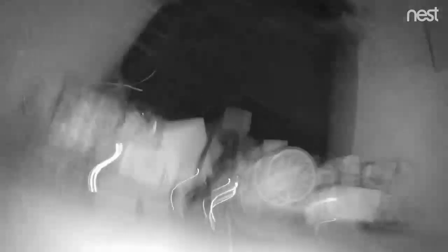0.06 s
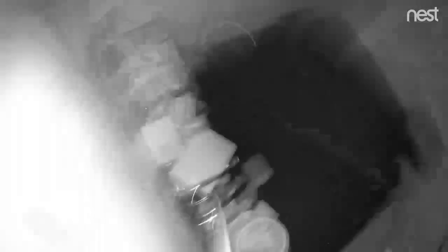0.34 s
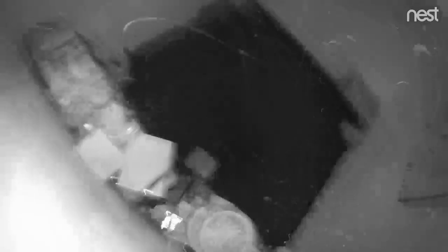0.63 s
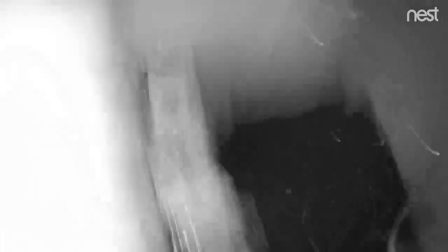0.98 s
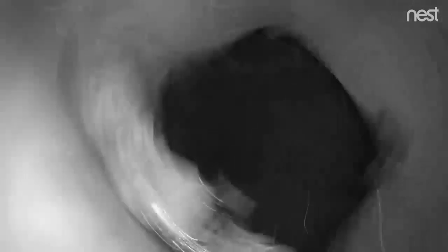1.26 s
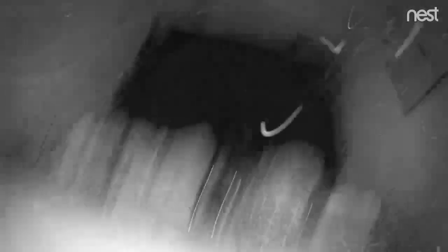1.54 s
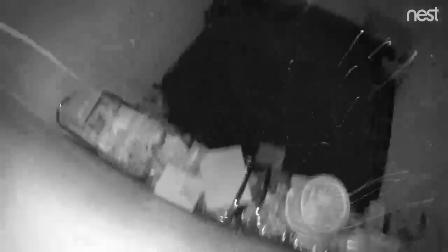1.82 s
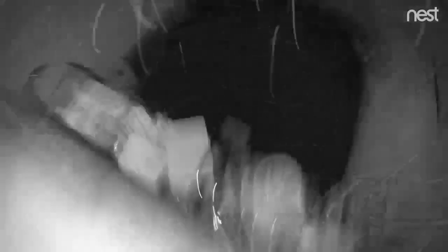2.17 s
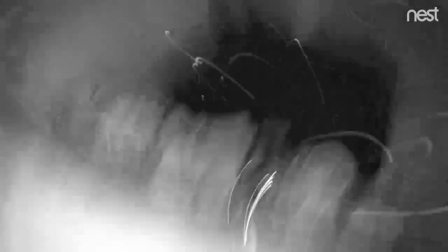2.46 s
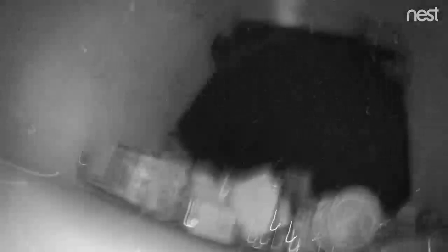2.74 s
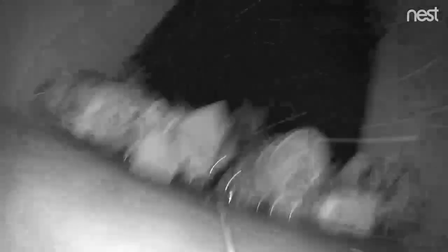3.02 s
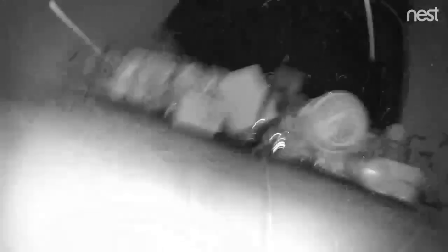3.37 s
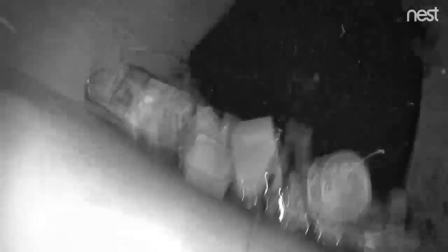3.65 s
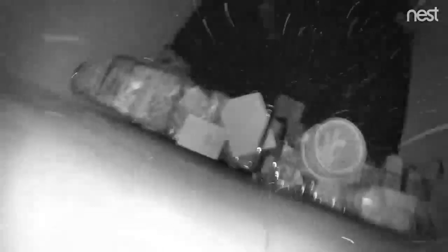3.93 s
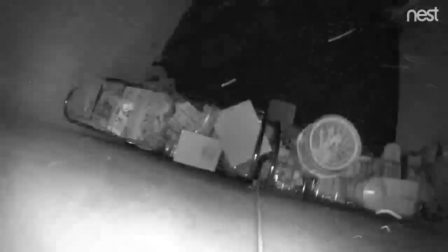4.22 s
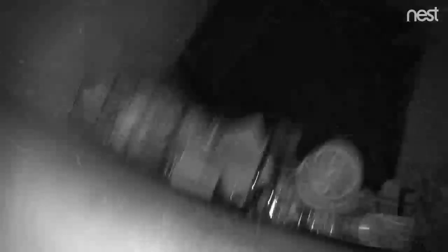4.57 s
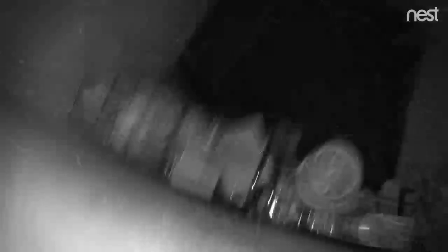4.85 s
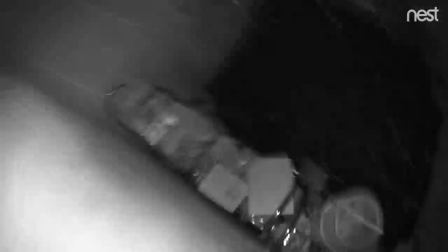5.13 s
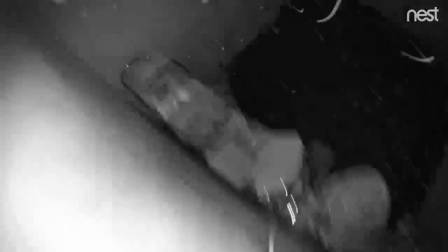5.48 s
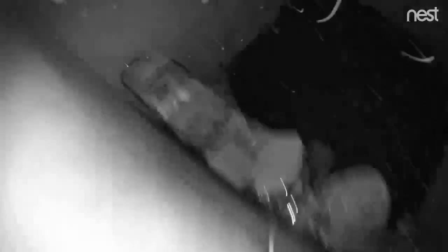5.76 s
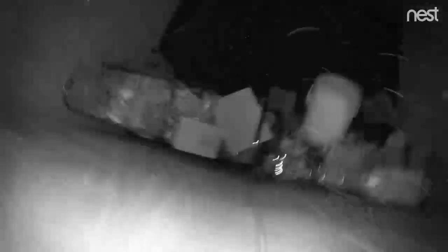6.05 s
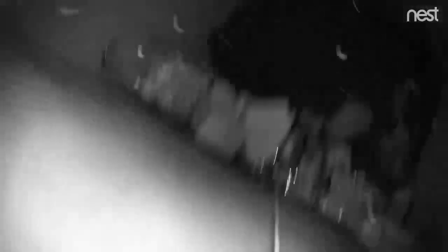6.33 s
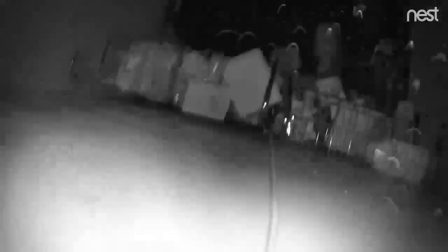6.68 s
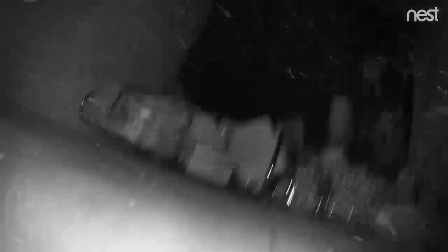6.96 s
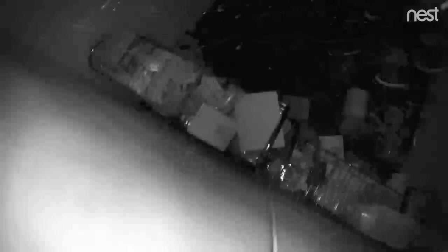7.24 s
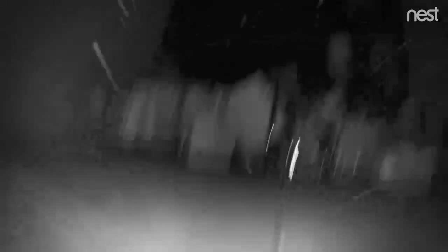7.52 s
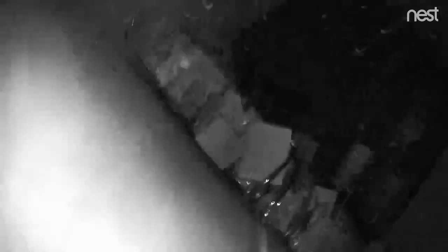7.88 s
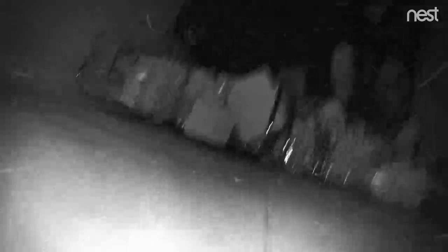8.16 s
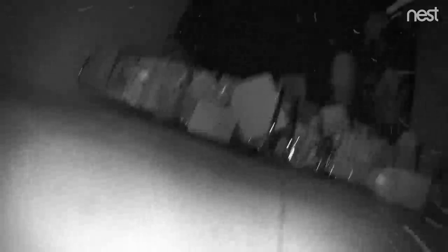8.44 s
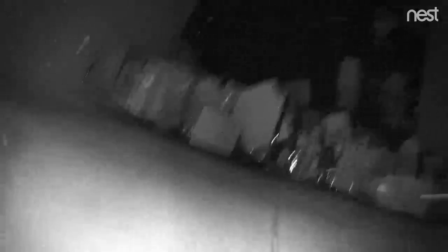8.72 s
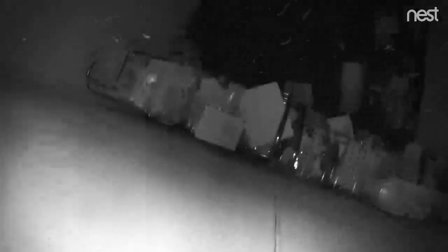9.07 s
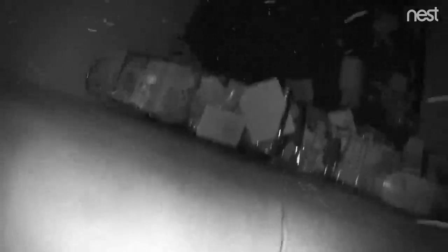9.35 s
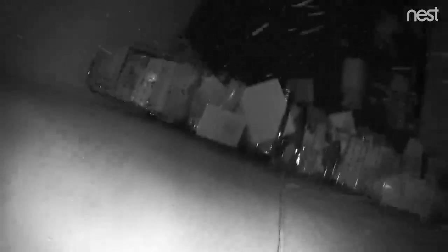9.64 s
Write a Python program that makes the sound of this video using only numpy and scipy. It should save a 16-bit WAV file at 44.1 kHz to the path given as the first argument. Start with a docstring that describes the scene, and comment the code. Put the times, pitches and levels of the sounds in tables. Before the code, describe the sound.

Walls and furniture rumble in an earthquake as shelves of small things clatter and heavier objects fall, the shaking slowly easing.

```python
"""An earthquake shakes a room, heard through a small microphone on a shelf of trinkets.
From the start the building rumbles, furniture thumps and loose things rattle. At once heavy things
bang and tumble further off, small hard ones clack close by, and jolted shelves clatter in bursts.
Near 2 s a glass clinks and a metal object is shaken into ringing until it falls over. More bangs and
glasses come from 6 s on; the shaking slowly eases, with a last surge of falls near 8.5 s."""
import sys
import numpy as np
from scipy import signal
from scipy.fft import rfft, irfft
from scipy.io import wavfile

SR = 44100
rng = np.random.default_rng(int(sys.argv[2]) if len(sys.argv) > 2 else 0)


def waveform_to_disk(signal):
    """Save audio, clipped to [-1, 1], as 16-bit WAV at the path in sys.argv[1]."""
    frames = np.transpose(np.atleast_2d(signal))
    scaled = np.clip(frames, -1, 1) * 32767
    samples = np.round(scaled).astype(np.int16)
    wavfile.write(sys.argv[1], SR, samples)


N = 436590
TIME = np.arange(N) / SR


def gain_of(db):
    """Decibels to amplitude."""
    return 10 ** (np.asarray(db) / 20)


def unit_rms(x):
    """Scales to an rms of one."""
    return x / np.sqrt(np.mean(x ** 2) + 1e-20)


def decay(t, t60_s):
    """Exponential fall, 60 dB in t60_s."""
    return np.exp(-np.log(1000) * t / t60_s)


def at_hz(points, hz):
    """Interpolates a table over log frequency."""
    f, value = np.transpose(points)
    return np.interp(np.log(hz + 1), np.log(f + 1), value)


def follow(rows, column=1):
    """One column of a time curve, at every sample."""
    rows = np.asarray(rows)
    return np.interp(TIME, rows[:, 0], rows[:, column])


def add(mix, start_s, sound):
    """Mixes a sound in at start_s."""
    part = mix[max(round(start_s * SR), 0):][:len(sound)]
    part += sound[:len(part)]


def coloured(x, spectrum):
    """Filters x by a spectrum; unit rms."""
    hz = np.fft.rfftfreq(len(x), 1 / SR)
    return unit_rms(irfft(rfft(x) * gain_of(at_hz(spectrum, hz)), len(x)))


def burst(noise, envelope):
    """Shaped noise with the energy of its envelope."""
    return unit_rms(noise * envelope) * np.sqrt(np.mean(envelope ** 2))


def wander(hz):
    """Random drift of bandwidth hz, rms about one."""
    points = 4096
    f = np.fft.rfftfreq(points, N / SR / points)
    drift = unit_rms(irfft(rfft(rng.standard_normal(points)) * np.exp(-(f / hz) ** 2)))
    return np.interp(TIME, np.linspace(0, N / SR, points), drift)


def impacts(per_s, spread_db, size=N):
    """Random train of blows; a positive spread makes a few stand out."""
    strength = gain_of(spread_db * np.minimum(rng.exponential(1, size), np.pi))
    return strength * rng.choice([-1., 1.], size) * (rng.random(size) < per_s / SR)


def jolt(start_s, db, rise_s, steepness=0.7):
    """Envelope of one jolt: peaks after rise_s, dies away more slowly."""
    age = np.maximum(TIME - start_s, 1e-9) / rise_s
    return gain_of(db) * np.exp(np.maximum(steepness * (np.log(age) + 1 - age), -20))


# Room decay: (frequency [Hz], t60 [s])
ROOM_DECAY = [(150, 0.37), (500, 0.37), (1500, 0.31), (3000, 0.31), (7000, 0.14)]


def room(x):
    """Dense reflections, treble dying first; the tail outlasts x."""
    taps = rng.standard_normal(SR // 2) * (rng.random(SR // 2) < .1)
    hz, t, bands = signal.stft(taps, SR, nperseg=256)
    tail = signal.istft(bands * decay(t, at_hz(ROOM_DECAY, hz)[:, None]), SR, nperseg=256)[1]
    return signal.oaconvolve(x, tail / np.linalg.norm(tail))


def scattered_room(x, hop_s=.25):
    """Sources lie all over the room, so each moment has its own reflections."""
    out = np.zeros(N)
    for centre_s in np.arange(0, N / SR + hop_s, hop_s):
        span = slice(max(round((centre_s - hop_s) * SR), 0), round((centre_s + hop_s) * SR))
        window = np.cos(np.pi / 2 * (TIME[span] - centre_s) / hop_s)
        add(out, span.start / SR, room(x[span] * window))
    return out


# Quake strength: (time [s], rumble level [dB], rattle level [dB])
QUAKE = [(0, -30, -33), (.33, -36, -39), (.6, -35.5, -37), (1.3, -38.5, -37.5), (1.7, -41.5, -40),
         (2.05, -38, -41), (2.4, -39.5, -33), (2.85, -39.5, -41), (3.65, -39.5, -40.5), (3.8, -41.5, -44),
         (4.35, -45, -49), (4.62, -43.5, -42), (4.9, -40.5, -42), (5.25, -46.5, -47), (5.65, -40, -41.5),
         (6.25, -40, -40), (6.85, -43, -39.5), (7.25, -46, -47), (7.55, -42, -45), (7.9, -48, -50.5),
         (8.15, -50.5, -48), (8.4, -54, -54.5), (8.72, -40, -45), (9.08, -58, -56), (9.4, -56.5, -57),
         (9.9, -49, -50.5)]


def shaking_db(column, jolts, steady_db=0):
    """Steady shaking and jolts, summed in power."""
    steady = gain_of(follow(QUAKE, column) + steady_db)
    return 10 * np.log10(steady ** 2 + sum(strength ** 2 for strength in jolts))


# Furniture landings: (time [s], level [dB])
LANDINGS = [(0.0, -33), (0.281, -32), (0.68, -31), (0.85, -45), (2.17, -27.5), (2.509, -32), (2.98, -33),
            (3.21, -35), (3.36, -45), (4.0, -42), (4.44, -40), (5.36, -36.5), (5.745, -36.5), (5.82, -35.5),
            (6.049, -28), (6.59, -31), (6.9, -39.5), (7.058, -37), (7.42, -35.5), (7.765, -40),
            (8.11, -47.5), (8.585, -39), (9.83, -62)]


def thumps(rise_s=0.024):
    """Rocking furniture comes down on the floor: one envelope per landing."""
    return (jolt(start_s, db, rise_s) for start_s, db in LANDINGS)


# Spectrum of walls and furniture: (frequency [Hz], density [dB])
STRUCTURE_SPECTRUM = [(20, -26), (50, -19), (110, -16), (150, -9.5), (210, -6.5), (310, -1.5), (420, 2),
                      (540, 0.5), (720, 0.5), (1000, -9), (1600, -9.5), (3000, -38), (8000, -78)]
# Heavy floor relative to light furniture: (time [s], bass gain [dB])
FLOOR_WEIGHT = [(0, 0.5), (2.4, 8), (3.9, -1.5), (4.6, 7.5), (5.4, 0.5), (6.2, 3), (9.9, 2)]


def rumble(steady_db=1, throb_db=1, floor_swing_db=2, floor_hz=280):
    """Walls, floor and furniture knock together many times a second."""
    knocks = impacts(per_s=420, spread_db=2.5)
    body = coloured(knocks + scattered_room(knocks), STRUCTURE_SPECTRUM)
    floor = signal.sosfiltfilt(signal.butter(2, floor_hz, fs=SR, output="sos"), body)
    floor_gain = gain_of(follow(FLOOR_WEIGHT) + floor_swing_db * wander(hz=27))
    force_db = shaking_db(column=1, jolts=thumps(), steady_db=steady_db)
    return (body - floor + floor * floor_gain) * gain_of(force_db + throb_db * wander(hz=41))


# Spectrum of the heaving ground: (frequency [Hz], density [dB])
GROUND_SPECTRUM = [(15, -18.5), (30, -11), (50, 1), (70, -0.5), (110, -9.5), (200, -24), (600, -63.5)]


def ground(level_db=-24.5, heave_db=1.5):
    """The ground heaves under the house, swelling with the shaking and each thump."""
    force_db = shaking_db(column=1, jolts=thumps())
    deep = coloured(rng.standard_normal(N), GROUND_SPECTRUM)
    return deep * gain_of(force_db + level_db + heave_db * wander(hz=8))


def chatter(t60_s=0.029, blows_per_s=130, modes=16):
    """One loose thing bounces briefly, ringing on its own modes."""
    t, window = np.arange(SR // 40) / SR, np.hanning(SR // 8)
    hz = rng.uniform(400, 7500, (modes, 1))
    mode_t60_s = t60_s * 2 ** rng.uniform(-1, 1, (modes, 1))
    phase = 2 * np.pi * (hz * t + rng.random((modes, 1)))
    ring = (np.sin(phase) * decay(t, mode_t60_s) / np.sqrt(mode_t60_s)).sum(0)
    blows = rng.standard_normal(len(window)) * (rng.random(len(window)) < blows_per_s / SR)
    return unit_rms(signal.fftconvolve(blows * window, ring))


# Spectrum of all loose things: (frequency [Hz], density [dB])
RATTLE_SPECTRUM = [(100, -27), (500, 2), (900, -4.5), (1300, -2), (1800, 0.5), (2200, -1.5), (3100, -3.5),
                   (4200, -7.5), (5200, -12), (6700, -21.5), (7400, -49.5), (9000, -68.5)]


def rattle(steady_db=2, count=500, spread_db=2, grit_db=1, wet_db=1, treble_hz=3500):
    """Loose things chatter in turn across the room, over a grit of tiny contacts."""
    things = np.zeros(N + SR)  # 1 s lead-in
    levels_db = spread_db * np.clip(rng.standard_normal(count), -2, 2)
    for start_s, db in zip(np.linspace(0, N / SR + 1, count), levels_db):
        add(things, start_s, gain_of(db) * chatter())
    grit = gain_of(grit_db) * unit_rms(impacts(per_s=1800, spread_db=3.5))
    direct = unit_rms(things[SR:]) + grit
    body = coloured(direct + gain_of(wet_db) * scattered_room(direct), RATTLE_SPECTRUM)
    force_db = shaking_db(column=2, jolts=clatters(), steady_db=steady_db)
    dull = signal.sosfiltfilt(signal.butter(1, treble_hz, fs=SR, output="sos"), body)
    treble_gain = gain_of(0.14 * (force_db + 29))  # harder contacts are shorter, so brighter
    return (dull + (body - dull) * treble_gain) * gain_of(force_db)


# Spectra of a crash and a thud: (frequency [Hz], density [dB])
CRASH_SPECTRUM = [(150, -26.5), (700, 8), (1200, 5.5), (2000, 5), (3000, 1), (4300, 0), (5500, -7),
                  (7000, -12.5), (8000, -32.5), (9000, -31)]
THUD_SPECTRUM = [(25, -27), (80, -13), (170, -3.5), (260, -1.5), (420, 8), (720, 4), (1100, -13.5),
                 (2500, -25.5), (8000, -71.5)]
# Heavy falls: (time [s], crash level [dB], thud level [dB], rise [s], t60 [s],
# bulk as thud pitch divisor [ratio], crash tilt [dB/octave])
FALLS = [(.024, -38, -28, 0.0025, 0.044, 1.7, -5), (.878, -33.5, -31.5, 0.0018, .06, 1.2, -14),
         (1.31, -30, -31.5, 0.00306, 0.039, 1.06, -6), (0.217, -21, -28, 0.001, 0.094, 1.1, -6),
         (0.413, -38, -40.5, 0.034, 0.19, 2, 8.5), (0.555, -21, -29, 0.0082, 0.092, 0.7, -9.5),
         (1.1154, -18.5, -25.5, 0.0016, 0.028, 1.95, -2), (1.235, -33, -26, 0.00051, 0.14, 1.18, -10),
         (1.842, -35, -43, 0.0025, 0.45, 1.4, 4.5), (2.04, -37.5, -23, 0.018, 0.28, 0.92, 7.5),
         (2.49, -35.5, -30, 0.012, 0.57, 1.2, 7), (2.756, -28, -26, 0.007, 0.032, 0.98, -14),
         (3.96, -34, -34.5, 0.014, 0.16, 0.77, 3), (4.0, -46, -33.5, 0.027, 0.17, .85, 0),
         (4.969, -37.5, -30.5, 0.0033, 0.16, 1.4, -5), (5.734, -27.5, -30, 0.028, 0.19, 1, -2),
         (6.034, -17.5, -16, 0.0037, 0.051, 1, 1.5), (6.046, -28, -21, 0.0031, 0.043, 1.1, -2),
         (6.099, -34.5, -31, 0.0071, 0.13, 0.86, -0.5), (6.5507, -18.5, -25, 0.00197, 0.14, 1.46, -2.5),
         (6.568, -23, -24.5, 0.00084, 0.068, 1.14, 0), (6.584, -20.5, -21.5, 0.0011, 0.041, 1.5, -11),
         (7.744, -47, -34, 0.023, 0.23, 1.57, -10), (8.423, -35, -46, 0.014, 0.5, 0.89, -5.5),
         (8.461, -29, -34.5, .001, 0.5, 1.06, -5), (8.539, -45, -51, 0.028, 0.19, 0.98, 4),
         (8.573, -30, -36, 0.00295, 0.17, 1, -0.5), (8.6, -29, -33, 0.0029, 0.083, 1.8, -4.5)]


def bangs(wet_db=-8, lag_per_rise=2.264, max_lag_s=.009):
    """A fall: many edges crash, then the whole weight thuds, later if the landing is gradual."""
    t, out = np.arange(SR // 2) / SR, np.zeros(N)
    for start_s, crash_db, thud_db, rise_s, t60_s, bulk, tilt in FALLS:
        envelope = np.minimum(t / rise_s, 1) * decay(np.maximum(t - rise_s, 0), t60_s)
        edges = impacts(per_s=6000, spread_db=-1.3, size=len(t))
        crash = coloured(edges, [(hz, db + tilt * np.log2(hz)) for hz, db in CRASH_SPECTRUM])
        thud = coloured(rng.standard_normal(len(t)), [(hz / bulk, db) for hz, db in THUD_SPECTRUM])
        lag_s = min(lag_per_rise * rise_s, max_lag_s)
        add(out, start_s, gain_of(crash_db) * burst(crash, envelope))
        add(out, start_s + lag_s, gain_of(thud_db) * burst(thud, envelope))
    return out + gain_of(wet_db) * room(out)[:N]


# Body spectrum of a small hard thing: (frequency [Hz], density [dB])
KNOCK_SPECTRUM = [(200, -10.5), (700, -10), (1400, 1), (2400, 6.5), (3300, 6.5), (4100, -10), (5200, -10.5),
                  (7500, -29), (9000, -59.5)]
# Close strikes: (time [s], level [dB], pitch [Hz], ring t60 [s], rebound gain [dB],
# rebound delay [s], knock gain [dB])
STRIKES = [(0.2167, -12, 2000, 0.025, 1.5, 0.0068, -6.5), (0.337, -21, 2700, 0.014, -15, .004, -6.5),
           (0.4356, -15, 2600, .011, -1, .012, -5), (0.4673, -16.5, 3200, .012, 2, .0045, -8),
           (.4905, -16, 2400, 0.012, -11, .004, -10), (0.5275, -14.5, 2230, 0.0083, 2, 0.005, -3.5),
           (.932, -18, 3150, 0.01, -7, 0.0041, 0), (1.1168, -13.5, 1540, 0.0052, 0.5, 0.0024, -6),
           (1.2355, -23, 950, 0.01, -7, .009, -16), (1.471, -10, 2820, 0.0096, -1.5, 0.0038, -7.5),
           (1.632, -28, 2450, 0.014, 7, 0.0045, -12), (1.7756, -23, 2460, 0.012, 2.5, 0.0045, -14),
           (1.839, -14.5, 3090, .011, 0.5, .0025, -7), (1.8395, -19, 4470, 0.0092, -2, .003, -14),
           (2.0695, -18, 2520, 0.0085, -8, .008, -9), (2.41, -13, 2400, 0.016, -6, 0.0058, -10),
           (2.7595, -9, 1946, 0.011, -1, .0026, -3.5), (3.1824, -8, 2340, 0.013, -3.5, .0024, -8),
           (3.329, -29, 2340, 0.026, 5, 0.0047, -12), (4.412, -30.5, 1800, 0.018, 0, 0.0046, -20),
           (4.582, -28, 2420, 0.011, -5, 0.0036, -6), (4.705, -26, 3190, 0.02, -2, .004, -15),
           (4.764, -31.5, 2580, .02, -6, 0.0046, -15), (5.034, -30, 2420, 0.02, -3, 0.0035, -7),
           (5.3856, -20.5, 2340, 0.013, -9, 0.0046, -10), (5.549, -25, 1680, 0.02, 2, 0.005, -21),
           (6.039, -10.5, 4530, 0.013, -5, .0105, -7), (6.904, -33, 2000, 0.018, -6, .004, -17),
           (6.94, -18.5, 1780, 0.026, 2, 0.0035, -12), (7.283, -32, 2920, 0.016, -1, 0.0043, 1),
           (7.6203, -11.5, 2480, 0.011, -1.5, 0.0034, -7.5), (7.678, -22, 3190, 0.011, 4, 0.0047, -3),
           (7.9547, -19, 2450, 0.0063, -1, 0.0032, -6)]


def clacks(level_db=-1, low_gain=0.25, low_ratio=0.567, knock_t60_s=0.019, wet_db=-17):
    """A small hard thing strikes, rings briefly over a woody knock, and rebounds once."""
    t, out = np.arange(SR // 10) / SR, np.zeros(N)
    attack = np.minimum(t / .0015, 1)
    for start_s, db, hz, t60_s, rebound_db, rebound_s, knock_db in STRIKES:
        for blow_s, blow_db in ((start_s, db), (start_s + rebound_s, db + rebound_db)):
            phase = 2 * np.pi * hz * rng.uniform(.96, 1.04) * t
            ping = (np.sin(phase) + low_gain * np.sin(low_ratio * phase)) * attack * decay(t, t60_s)
            wood = coloured(rng.standard_normal(len(t)), KNOCK_SPECTRUM)
            knock = gain_of(knock_db) * burst(wood, attack * decay(t, knock_t60_s))
            add(out, blow_s, gain_of(blow_db + level_db) * (ping + knock))
    return out + gain_of(wet_db) * room(out)[:N]


# Shelf jolts: (time [s], level [dB], rise [s])
SHELF_JOLTS = [(0.403, -28.5, 0.055), (0.49, -31, 0.025), (0.66, -33.5, 0.018), (1.865, -32, 0.041),
               (1.999, -27, 0.048), (2.715, -35.5, 0.016), (3.22, -37.5, 0.022), (3.96, -34.5, 0.04),
               (4.23, -40.5, 0.025), (5.349, -37.5, 0.023), (5.53, -40, 0.036), (5.729, -27.5, 0.028),
               (6.36, -35, 0.046), (6.875, -32, 0.048), (7.28, -40, 0.058), (7.75, -37.5, 0.022),
               (8.13, -49.5, 0.036), (8.533, -30.5, 0.036)]


def clatters():
    """A full shelf is jolted and settles: one envelope per jolt."""
    return (jolt(*row) for row in SHELF_JOLTS)


def ticks(level_db=6, count=900, t60_s=0.0061, low_hz=1600, high_hz=4900, wet_db=-9):
    """In each clatter the nearest things tick one by one, each on its own pitch."""
    t, out = np.arange(SR // 25) / SR, np.zeros(N)
    force = sum(clatters())
    for when, pitch, strength in rng.random((count, 3)):
        onset = int(when * N)
        hz = low_hz * (high_hz / low_hz) ** pitch
        attack = np.minimum(t * hz / 2, 1)  # two cycles
        tick = np.sin(2 * np.pi * hz * t) * attack * decay(t, t60_s)
        add(out, onset / SR, strength * force[onset] * tick)
    return gain_of(level_db) * (out + gain_of(wet_db) * room(out)[:N])


# Knocked glasses: (time [s], pitch [Hz], level [dB], t60 [s])
CLINKS = [(1.841, 3150, -30, 0.12), (2.785, 3240, -46, .25), (6.365, 4130, -39, 0.53),
          (6.585, 3970, -38, 0.43), (6.895, 1970, -26.5, 0.22), (6.93, 4520, -38.5, 0.34),
          (7.959, 3400, -40, 0.071)]


def glasses(upper_gain=0.28, upper_ratio=1.6, rise_s=0.0026):
    """Each nearby glass rings on two modes, the upper dying twice as fast."""
    t, out = np.arange(SR // 3) / SR, np.zeros(N)
    attack = np.minimum(t / rise_s, 1)
    for start_s, hz, db, t60_s in CLINKS:
        phase, fade = 2 * np.pi * hz * t, decay(t, t60_s)
        ring = np.sin(phase) + upper_gain * fade * np.sin(upper_ratio * phase)
        add(out, start_s, gain_of(db) * ring * attack * fade)
    return out


# Modes of the metal object: (frequency [Hz], level [dB], t60 [s])
METAL_MODES = [(2126, -8, .15), (2182, -7, .15), (2292, -8, .15), (2475, -5, .15), (2528, -3, .2),
               (2627, 0, .2), (2670, -5, .15), (2757, -4, .2), (3078, -3, .2), (3126, -2, .2),
               (3215, -1, .2), (3248, -5, .2), (3288, -7, .2), (3520, -10, .2), (3755, -8, .2),
               (4098, 0, .35), (4152, -7, .2), (4395, 0, .35), (4424, -10, .2), (4560, -14, .2),
               (4885, -11, .2), (5153, -10, .25), (5255, -13, .25), (5415, -10, .25)]
# How hard it is shaken: (time [s], level [dB])
METAL_SHAKING = [(1.85, -45), (2.0, -43), (2.1, -29.5), (2.22, -46.5), (2.38, -41), (2.5, -31), (2.6, -38),
                 (2.74, -30), (2.8, -63)]
# Its scrapes along its neighbours: (time [s], pitch [Hz], level [dB], rise [s])
METAL_SCRAPES = [(2.07, 5350, -32.5, 0.048), (2.112, 3110, -33, 0.032), (2.25, 3170, -39, 0.043),
                 (2.405, 4090, -39.5, 0.042), (2.41, 2600, -36.5, 0.041), (2.43, 3150, -44, 0.044),
                 (2.44, 5280, -40, 0.038), (2.474, 4395, -31.5, 0.026), (2.61, 3250, -40, 0.023),
                 (2.66, 4098, -32.5, 0.024), (2.705, 2600, -37, 0.03)]


def jangle(sing_db=-0.5, reach_hz=110, roughness=0.53, jitter_rad=.33, topple_s=2.75, damp_s=0.013):
    """Quick blows keep metal ringing; scrapes make modes near one pitch sing until it topples."""
    span = slice(round(METAL_SHAKING[0][0] * SR), round(METAL_SHAKING[-1][0] * SR))
    t, now, out = np.arange(SR // 3) / SR, TIME[span], np.zeros(N)
    blows = impacts(per_s=200, spread_db=2, size=len(now)) * gain_of(3 * wander(hz=25)[span])
    modes_rms = np.linalg.norm([gain_of(db) for _, db, _ in METAL_MODES])
    shaking = gain_of(follow(METAL_SHAKING)[span]) / modes_rms
    contact = gain_of(4.5 * wander(hz=30.4)[span])
    damping = np.exp(-np.maximum(now - topple_s, 0) / damp_s)
    scrapes = [(hz, damping * jolt(start_s, db + sing_db, rise_s)[span])
               for start_s, hz, db, rise_s in METAL_SCRAPES]
    for hz, db, t60_s in METAL_MODES:
        ring = rng.choice([-1, 1]) * np.sin(2 * np.pi * hz * t) * decay(t, t60_s)
        struck = unit_rms(signal.fftconvolve(blows, ring)[:len(now)])
        phase = 2 * np.pi * (hz * now + rng.random()) + jitter_rad * wander(hz=35)[span]
        sung = unit_rms(np.sin(phase) * (1 + roughness * wander(hz=70)[span]) * contact)
        drive = sum(force * np.exp(-((hz - near_hz) / reach_hz) ** 2) for near_hz, force in scrapes)
        out[span] += gain_of(db) * (shaking * struck + drive * sung)
    return out


def scene():
    """Everything that shakes, in one channel."""
    return (rumble() + rattle() + ticks() + jangle() + glasses() + clacks() + bangs() + ground())[None]


def record(dry):
    """A small microphone's narrow band: low-pass at 8700 Hz."""
    lowpass = signal.firwin(255, 8700, window=("kaiser", 9), fs=SR)
    return signal.oaconvolve(dry, lowpass[None], "same")


dry = scene()
out = record(dry)
waveform_to_disk(out)
```